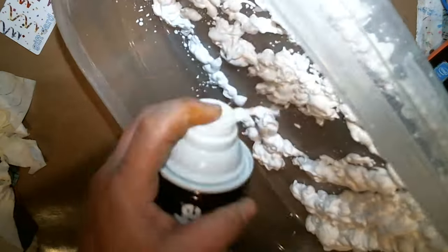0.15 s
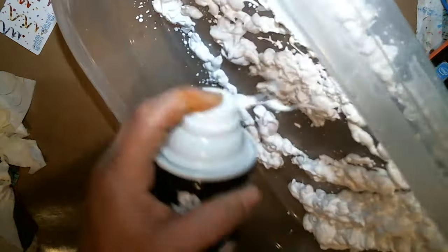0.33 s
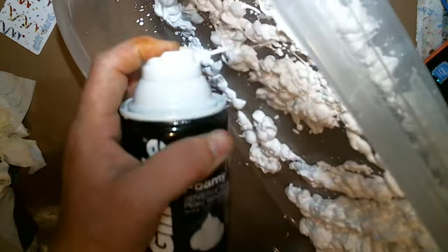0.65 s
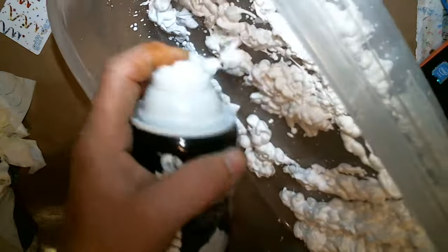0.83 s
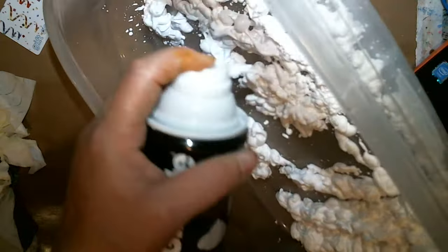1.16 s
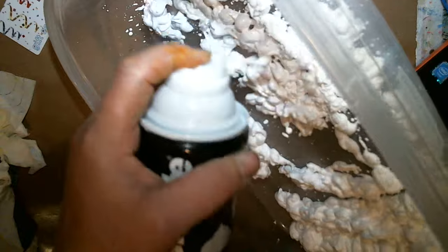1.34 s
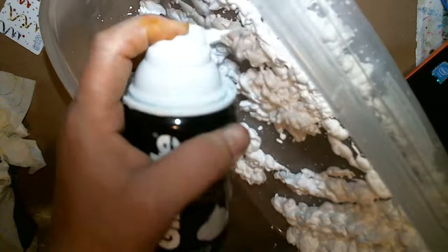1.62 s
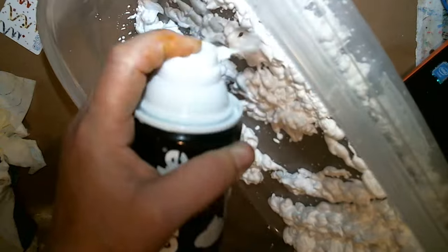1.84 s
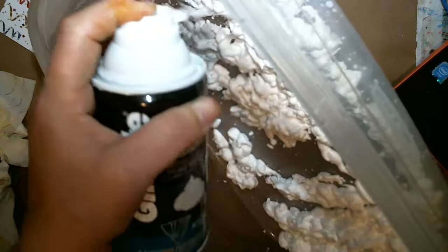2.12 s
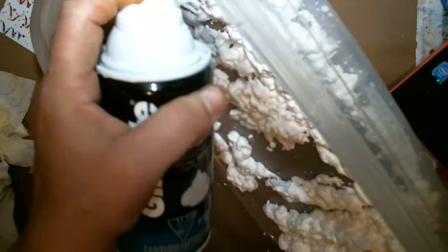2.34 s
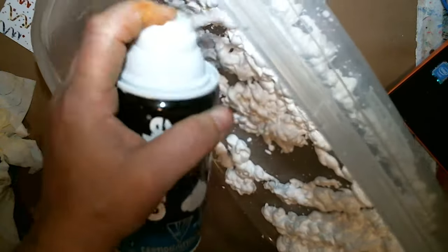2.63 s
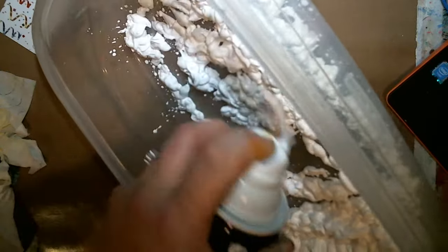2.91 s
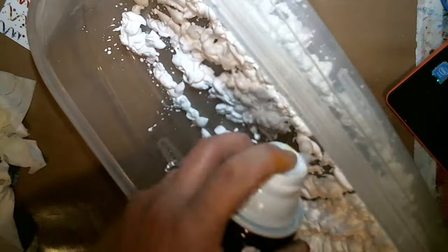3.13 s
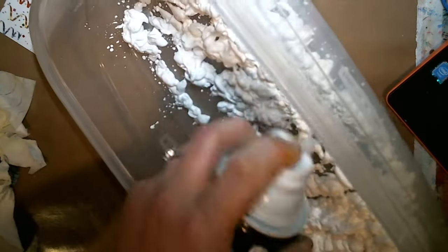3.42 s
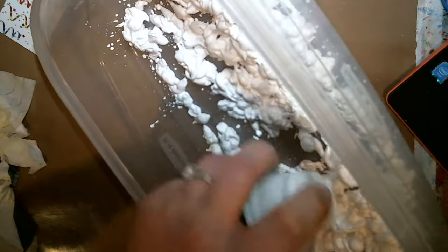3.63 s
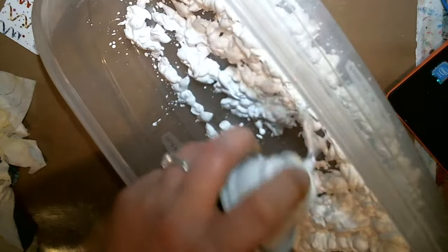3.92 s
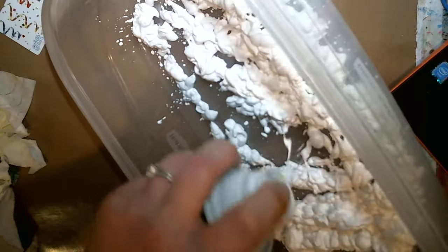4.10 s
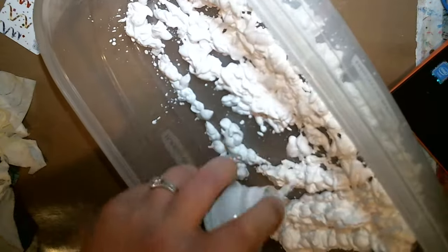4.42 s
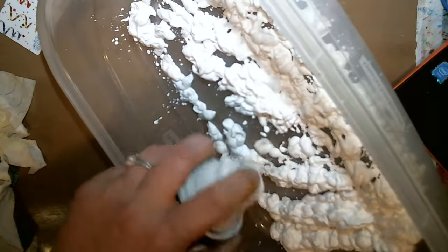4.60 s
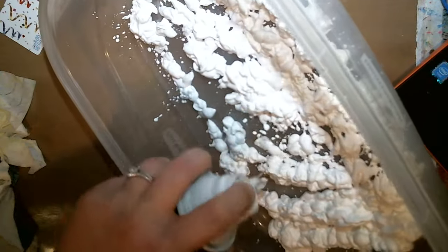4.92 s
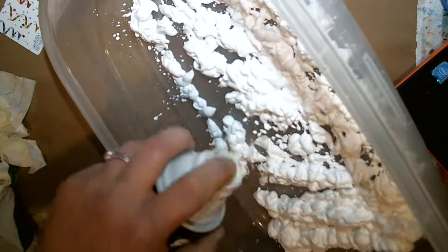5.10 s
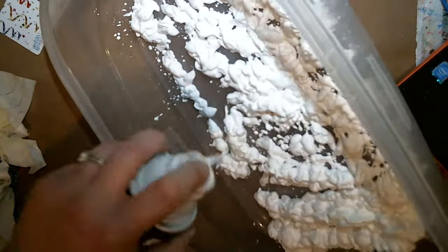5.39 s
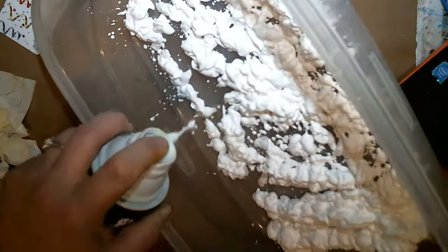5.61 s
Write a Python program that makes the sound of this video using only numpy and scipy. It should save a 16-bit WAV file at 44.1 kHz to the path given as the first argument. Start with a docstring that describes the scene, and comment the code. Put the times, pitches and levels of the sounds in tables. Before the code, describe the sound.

Very close to the microphone in a quiet room, a nearly empty aerosol can spits foam into a plastic tub. Dense irregular pops and crackling fizz begin at once over a hollow low gurgle, then turn drier and brighter with sharp bubble snaps. Spurts come unevenly, with brief gaps down to fine hiss, thicken with a wetter rasp after four seconds, thin out, and end on a fluttering whistly squirt.

```python
"""Sputtering foam can

A nearly empty aerosol can sputters foam into a plastic tub, close to the microphone, in a quiet room.
Gas breaks through in spurts: random pops ring the pocket they open; single big bubbles snap as swelling rings.
Small spurts, ticks, low gurgle and filtered-click fizz fill in; the last squirt whistles by pulsed nozzle resonance.
The tub adds a wall echo and a short noise tail; noise rumble, a harmonic buzz and soft sine bumps lie below."""
import sys
import numpy as np
from scipy import signal
from scipy.fft import rfft, irfft, next_fast_len
from scipy.io import wavfile
from scipy.ndimage import uniform_filter1d, map_coordinates

SR = 44100
rng = np.random.default_rng(int(sys.argv[2]) if len(sys.argv) > 2 else 0)


def store_wav(level_fs):
    """Save 16-bit WAV to argv[1]."""
    pcm = np.round(np.clip(np.atleast_2d(level_fs), -1, 1) * 32767)
    wavfile.write(sys.argv[1], SR, pcm.T.astype(np.int16))


N = 253560

# room rumble spectrum: f/Hz, relative density/dB
RUMBLE_SPECTRUM = [(15, -43), (25, -18), (91, -4.5), (188, 6), (366, 1.5), (413, -2), (450, -23),
                   (580, -34), (990, -120)]
# buzz harmonics: multiple of BUZZ_HZ, rms level/dB
BUZZ_HARMONICS = [(2, -87.5), (3, -84), (4, -85.5), (5, -89), (6, -85)]
# soft bumps of the hand on the can: t/s, peak level/dB, f/Hz
HAND_BUMPS = [(1.228, -59, 150), (1.96, -61, 224), (2.117, -59, 176), (2.472, -59, 121), (2.847, -62, 124),
              (3.083, -58, 176), (3.249, -59, 142), (3.701, -71, 70.6), (3.8, -63, 100), (3.878, -55, 176),
              (4.168, -64, 108), (4.478, -63, 92), (5.348, -66, 248), (5.451, -59, 171)]
# spray under the loud spurts: t/s, fizz level/dB, blend between two fizz colours/0-1
SPRAY_COURSE = [(0.0, -42, 0.13), (0.5, -42.5, 0.15), (0.75, -45.5, 0.12), (1.2, -46.5, 0.3),
                (1.36, -46, 0.44), (1.76, -45.5, 0.36), (2.58, -47, 0.46), (3.5, -47, 0.54),
                (3.91, -44, 0.36), (4.05, -45, 0.56), (4.5, -46.5, 0.1), (5.0, -45.5, 0.28),
                (5.75, -48.5, 0.14)]
# first fizz colour: f/Hz, shape (times 5.5 - blend gives dB)
FIRST_COLOUR = [(760, -0.5), (1300, -10), (1470, -2), (1630, 1), (1950, 0), (2230, -4), (2480, -1.5),
                (3110, -3), (3950, -2), (4920, -1.5), (6310, -4), (7690, -4.5), (10300, -4.5), (12500, -56),
                (15600, -53)]
# second fizz colour: f/Hz, shape (times blend gives dB, added to the first colour)
SECOND_COLOUR = [(760, -28.5), (1300, 36), (1630, -54), (2100, 1), (2280, 6), (2810, 6.5), (3450, 8.5),
                 (3750, 0), (4390, 7), (5020, -23), (5510, -0.5), (6250, -10), (9180, 0.5), (10400, -10),
                 (15600, -47)]
# tub modes: f/Hz, width of first resonator/Hz, relative level/dB
TUB_MODES = [(610, 144, 3.5), (834, 240, -6.5), (1069, 73, 1.5), (1326, 207, 1.5), (1943, 380, -2)]
# two lowest tub modes: deep gurgle, strongest in the first 1.2 s, uneven, faint later: t/s, level/dB
DEEP_GURGLE_COURSE = [(0, -44), (0.1, -58), (0.2, -49.5), (0.65, -50), (0.74, -66), (0.82, -49),
                      (1.2, -59.5), (1.4, -58), (5.0, -60.5), (5.25, -55), (5.54, -65), (5.75, -59)]
# small spurts: pocket f/Hz, relative level/dB before the random size
SMALL_SPURT_LEVELS = [(3000, -18), (4500, 1), (6500, -1), (9000, -5.5), (12000, -17), (15000, -25)]
# echo off the tub wall: t/s, extra path/ms, strength/0-1 (held to 0.95)
WALL_COURSE = [(0, 0.29, 0.85), (2.0, 0.23, 0), (2.6, 0.65, 0.1), (3.9, 0.27, 0.07), (4.7, 0.36, 0.56),
               (5.2, 0.35, 0.24), (5.5, 0.33, 0.8), (5.75, 0.31, 1)]
# bands that sound hollow as the can moves: width/Hz, course of (t/s, f/Hz, depth/0-1, held to 0.9)
HOLLOW_BANDS = [(151, [(2.4, 930, 0), (2.8, 875, 0.3), (4.2, 956, 0.7), (4.7, 1050, 1), (5.2, 1085, 0.9),
                (5.55, 1100, 0.8), (5.75, 1400, 1)]), (103, [(0, 1670, 1), (1.9, 1650, 0.45),
                (2.4, 1580, 0)]), (810, [(0.4, 2600, 0.2), (0.7, 2760, 0.74), (1.15, 2930, 0.53),
                (1.25, 2640, 0), (1.8, 2500, 0.34), (2.0, 2760, 0.66), (3.8, 2750, 0.67), (4.4, 2960, 0.55),
                (5.2, 2520, 0.47)])]
# whistle pulses of the last squirt: start t/s, length/s, lower whistle level/dB, upper whistle level/dB
SQUIRT_PULSES = [(5.558, 0.02, -46, -59), (5.59, 0.027, -54, -61), (5.612, 0.0072, -48, -37),
                 (5.626, 0.0078, -34.5, -37), (5.638, 0.0085, -32, -33), (5.656, 0.017, -36.5, -45),
                 (5.678, 0.022, -45, -37), (5.699, 0.0067, -31, -38), (5.709, 0.0073, -31.5, -31),
                 (5.727, 0.0044, -30, -56), (5.73, 0.0046, -28, -24), (5.738, 0.0069, -40, -30.5)]
# resonances of the foam-narrowed nozzle: f/Hz, width/Hz
NOZZLE_RESONANCES = [(2420, 290), (4990, 280)]
# single large bubbles that snap open: t/s, level/dB, f/Hz at the top of the swell
BUBBLE_SNAPS = [(0.2177, -30, 4070), (0.4483, -20.5, 4420), (0.478, -35, 4040), (0.5157, -30.5, 4200),
                (0.623, -20, 4790), (0.987, -32, 5750), (1.082, -23, 5300), (1.3614, -30, 3460),
                (1.4845, -26, 5020), (1.518, -27, 3140), (1.6367, -28, 4700), (1.748, -30, 4600),
                (1.843, -27, 4500), (2.0223, -28.5, 4860), (2.0417, -25, 4190), (2.208, -32, 6060),
                (2.241, -32, 6620), (2.468, -37, 5600), (2.4849, -23.5, 6000), (2.583, -27, 4720),
                (2.793, -37, 4800), (2.808, -16.5, 8260), (3.014, -31, 4260), (3.0705, -26.5, 4750),
                (3.0842, -29, 7800), (3.259, -23.5, 8000), (3.572, -28, 5200), (3.6506, -27, 9200),
                (4.008, -22, 7150), (4.1833, -25.5, 3400), (4.3153, -39, 4550), (4.5244, -24, 4150),
                (4.536, -32, 5250), (4.701, -27.5, 5070), (5.0507, -41, 6000)]
# loud spurts: start t/s, length/s, level before fade and stutter/dB, pocket f/Hz
LOUD_SPURTS = [(0.003, 0.029, -46, 600), (0.035, 0.05, -38.5, 5830), (0.039, 0.055, -33.5, 630),
               (0.073, 0.031, -32, 3160), (0.14, 0.094, -34, 587), (0.21, 0.087, -52, 4660),
               (0.217, 0.049, -37, 610), (0.266, 0.034, -41.5, 1026), (0.273, 0.021, -34.5, 4070),
               (0.338, 0.041, -40, 8800), (0.402, 0.076, -37.5, 634), (0.428, 0.032, -31, 4850),
               (0.521, 0.12, -40.5, 890), (0.335, 0.044, -40.5, 587), (0.572, 0.1, -36, 627),
               (0.572, 0.046, -27.5, 5900), (0.617, 0.033, -39, 5060), (0.626, 0.032, -38.5, 10600),
               (0.676, 0.027, -35, 6500), (0.737, 0.05, -51, 1980), (0.742, 0.045, -36.5, 5140),
               (0.793, 0.057, -40, 913), (0.795, 0.053, -43.5, 560), (0.85, 0.03, -42, 1960),
               (0.885, 0.017, -55, 570), (0.888, 0.02, -34.5, 1310), (0.898, 0.024, -41, 2460),
               (0.937, 0.026, -28.5, 5200), (0.93, 0.046, -39.5, 1034), (0.945, 0.062, -42, 564),
               (0.969, 0.041, -30.5, 5920), (1.037, 0.0098, -37, 1040), (1.075, 0.028, -32, 5200),
               (1.098, 0.023, -31.5, 6100), (1.11, 0.033, -35.5, 9440), (1.118, 0.011, -35.5, 575),
               (1.15, 0.036, -39, 7000), (1.19, 0.03, -39, 2510), (1.21, 0.034, -42, 830),
               (1.24, 0.059, -46, 564), (1.214, 0.0069, -35, 4130), (1.222, 0.0063, -29.5, 5570),
               (1.258, 0.021, -36.5, 2420), (1.303, 0.048, -35, 2560), (1.295, 0.18, -40.5, 3340),
               (1.355, 0.022, -36, 3280), (1.41, 0.015, -36, 3350), (1.42, 0.034, -41.5, 2400),
               (1.47, 0.0079, -48, 5940), (1.515, 0.034, -36, 3200), (1.399, 0.042, -39, 3200),
               (1.45, 0.026, -47, 1040), (1.472, 0.039, -35.5, 5200), (1.488, 0.032, -35, 3140),
               (1.582, 0.039, -37, 4730), (1.67, 0.035, -39.5, 1020), (1.677, 0.014, -32, 5820),
               (1.681, 0.021, -32, 11000), (1.744, 0.068, -38, 4600), (1.768, 0.037, -36, 7550),
               (1.783, 0.03, -31.5, 4720), (1.838, 0.041, -40, 4750), (1.867, 0.015, -32, 6040),
               (2.036, 0.12, -41, 4350), (2.037, 0.059, -34, 6240), (2.076, 0.071, -42, 580),
               (2.091, 0.012, -34, 1325), (2.131, 0.034, -38, 10100), (2.203, 0.051, -37.5, 5970),
               (2.276, 0.026, -39, 5900), (2.343, 0.012, -26, 6030), (2.367, 0.024, -43, 9000),
               (2.402, 0.028, -56, 14100), (1.985, 0.021, -58, 13500), (2.14, 0.049, -52, 13500),
               (2.449, 0.082, -31, 5500), (2.481, 0.02, -27, 6500), (2.508, 0.0058, -31, 5000),
               (2.577, 0.028, -38, 6400), (2.661, 0.012, -23.5, 5800), (2.704, 0.047, -31.5, 4570),
               (2.755, 0.027, -42, 2700), (2.788, 0.014, -35.5, 4350), (2.789, 0.042, -32.5, 9500),
               (2.806, 0.0058, -26, 8100), (2.809, 0.041, -33, 3380), (2.835, 0.035, -46, 11000),
               (2.892, 0.011, -30, 3360), (2.895, 0.068, -34.5, 7500), (3.056, 0.029, -34.5, 4430),
               (3.078, 0.087, -40.5, 8230), (3.253, 0.049, -34.5, 8020), (3.27, 0.013, -26.5, 4910),
               (3.334, 0.018, -38, 1070), (3.349, 0.023, -38.5, 11100), (3.44, 0.0092, -23.5, 4480),
               (3.463, 0.014, -30.5, 4400), (3.47, 0.066, -42, 9000), (3.508, 0.037, -38, 4800),
               (3.568, 0.024, -34, 4470), (3.644, 0.021, -33.5, 8350), (3.792, 0.011, -24.5, 5320),
               (3.814, 0.033, -36, 5330), (3.914, 0.043, -38.5, 8530), (3.916, 0.027, -34.5, 3680),
               (3.976, 0.016, -26, 3840), (3.982, 0.0096, -28.5, 7600), (4.005, 0.042, -44.5, 8100),
               (4.013, 0.0097, -32, 2460), (4.029, 0.028, -28, 2510), (4.05, 0.033, -42, 8560),
               (4.149, 0.025, -32, 2440), (4.155, 0.013, -36, 10200), (4.178, 0.011, -25, 2516),
               (4.179, 0.032, -33.5, 3600), (4.201, 0.048, -35, 2580), (4.37, 0.027, -42.5, 2500),
               (4.225, 0.065, -40, 10300), (4.25, 0.072, -36, 1840), (4.462, 0.046, -37, 2190),
               (4.678, 0.039, -43, 2500), (4.7, 0.038, -61, 1680), (5.075, 0.1, -54, 1760),
               (4.412, 0.1, -39, 1800), (4.476, 0.019, -35.5, 9240), (4.519, 0.029, -23, 4580),
               (4.548, 0.018, -27, 5030), (4.56, 0.11, -32, 1880), (4.588, 0.06, -32.5, 1927),
               (4.632, 0.017, -33, 4900), (4.652, 0.011, -41, 9600), (4.692, 0.04, -43, 4700),
               (4.71, 0.029, -36, 10400), (4.735, 0.059, -39.5, 1850), (4.744, 0.016, -28, 8500),
               (4.832, 0.01, -22, 5800), (4.83, 0.017, -35, 2500), (4.899, 0.053, -31, 1874),
               (4.906, 0.023, -30.5, 4100), (4.959, 0.021, -39, 1930), (4.967, 0.012, -33, 4970),
               (4.975, 0.045, -38, 2460), (5.048, 0.027, -40, 1860), (5.049, 0.014, -31.5, 5900),
               (5.102, 0.0068, -33.5, 5630), (5.175, 0.018, -35.5, 5700), (5.322, 0.017, -37, 5600),
               (5.342, 0.014, -40.5, 9250), (4.37, 0.012, -38, 4650), (4.875, 0.022, -41, 5100),
               (2.745, 0.13, -55, 12100), (3.005, 0.031, -41.5, 10500), (5.4, 0.019, -36, 8840),
               (5.459, 0.043, -37, 4900), (5.613, 0.012, -33.5, 8400), (5.643, 0.0099, -35, 9000),
               (5.692, 0.014, -36.5, 8700), (5.743, 0.0043, -39, 8200)]
# pocket width at the usual spurt level: pocket f/Hz, width as share of f
POCKET_WIDTH_SHARE = [(600, 0.18), (1100, 0.081), (1850, 0.12), (2500, 0.17), (3200, 0.16), (5000, 0.43),
                      (9000, 0.44)]

CUTOFF_HZ = 15750
BUZZ_HZ, RUMBLE_DB = 30.3, -72.5
SMALL_DB, TICKS_REL_DB, UPPER_GURGLE_DB = -52, -13.5, -53
NARROWS_DB_PER_DB, USUAL_SPURT_DB = 1, -29
SNAP_SWELL_CYCLES, SNAP_CLIMB_PER_CYCLE, SNAP_GRIT_SHARE = 5.36, 0.0064, 0.28
NOZZLE_WAVER_SHARE = 0.016  # the foam lip shifts both whistles together
PULSE_EDGE_S, SEEP_DB, SEEP_DECAY_S = 0.003, -30, 0.0078  # seep: what leaks on after a pulse


def amp(db):
    """dB to amplitude."""
    return 10 ** (np.asarray(db) / 20)


def rms_one(x):
    """Scale to rms 1."""
    return x / np.sqrt(np.mean(x ** 2) + 1e-20)


def in_time(rows):
    """Interpolate each column of a time course to every sample."""
    s, *columns = np.transpose(rows)
    return [np.interp(np.arange(N) / SR, s, c) for c in columns]


def at_hz(points, hz):
    """Read a curve along log frequency."""
    hz_points, values = np.transpose(points)
    return np.interp(np.log(hz), np.log(hz_points), values)


def drift(rate_hz):
    """Slow chance, spread 1: noise through a double pole, run at SR / 40."""
    r = np.exp(-80 * np.pi * rate_hz / SR)
    noise = rng.standard_normal(N // 40 + 2002)
    slow = signal.lfilter([1], [1, -2 * r, r * r], noise)[2000:]
    return np.interp(np.arange(N) / 40, np.arange(len(slow)), rms_one(slow))


def resonate(x, hz, width_hz):
    """One resonance, gain 1 on top."""
    r = np.exp(-np.pi * width_hz / SR)
    poles = [1, -2 * r * np.cos(2 * np.pi * hz / SR), r * r]
    return signal.lfilter(np.array([1, 0, -1]) * (1 - r * r) / 2, poles, x)


def pops(per_s, spread_db, size):
    """Film bursts: clicks at random moments, mostly small, a few large."""
    draw = rng.random((3, size))
    sizes = amp(spread_db * np.minimum(-np.log(draw[0] + 1e-9), 4))
    signs = np.sign(draw[1] - .5)
    return rms_one(sizes * signs * (draw[2] < per_s / SR) + 1e-9)


def bands(x, spectrum, count, patchy_db):
    """Narrow bands with their centres; each band flickers on its own."""
    edges = np.geomspace(spectrum[0][0], spectrum[-1][0], count)
    for k, (low, high) in enumerate(zip(edges, edges[1:])):
        sos = signal.butter(2, [low, high], "band", fs=SR, output="sos")
        band = signal.sosfilt(sos, x[k % 2])
        yield np.sqrt(low * high), band * amp(patchy_db * drift(20.5))


def add_spurt(out, film, start_s, length_s, level_db, hz, width_hz, rise=0.015, edge_s=0.00083,
              swell=0.21, fade_db=-7.0, cycles=8.5, widest_hz=520):
    """Each pop rings a bubble of its own size; pitch climbs and level fades as the pocket empties."""
    i = max(round((start_s - edge_s / 2) * SR), 0)
    n = round((length_s + 5 * edge_s) * SR)
    t = np.arange(min(n, N - i)) / SR
    late = t / t[-1]
    gate = np.clip(t / (edge_s + swell * length_s), 0, 1) * amp(fade_db * t / length_s)
    gate = gate * np.exp(-np.maximum(t - length_s, 0) / edge_s)
    blow = film[0, i:i + len(t)] * gate
    bubble_of_pop = (film[1, i:i + len(t)] * 4).astype(int)
    rung = 0
    for k, offset in enumerate((-0.18, 0.0028, 0.14, 0.35)):
        bubble_hz = min(hz + offset * width_hz, .45 * SR)
        sharp_hz = min(bubble_hz / cycles, width_hz * 0.46, widest_hz * max(1, hz / 8500) ** 2)
        share = 1 + rise * 10 * offset * (2 * late - 1)  # small, high bubbles gain late
        ring = resonate(blow * (bubble_of_pop == k) * share + 1e-12, bubble_hz, sharp_hz)
        ring = resonate(ring, bubble_hz, 2.0 * sharp_hz)
        rung = rung + ring * (1 - 2.0 * abs(offset))
    out[i:i + len(t)] += amp(level_db) * rms_one(rung) * np.sqrt(np.mean(gate ** 2))


def wall_echo(x):
    """A short, dull echo cuts notches that move with the can."""
    path_ms, strength = in_time(WALL_COURSE)
    dull = signal.filtfilt(*signal.butter(2, 3800, fs=SR), x)
    late = map_coordinates(dull, [np.arange(N) - path_ms * SR / 1000], order=3)
    return x + np.clip(strength, 0, .95) * late


def dip(x, width_hz, rows):
    """A moving band is shifted to zero, isolated, shifted back and taken out."""
    hz, depth = in_time(rows)
    turn = np.exp(2j * np.pi * np.cumsum(hz) / SR)
    band = signal.filtfilt(*signal.butter(2, width_hz / 2, fs=SR), x / turn)
    return x - 2 * np.clip(depth, 0, .9) * (band * turn).real


def tub_tail(x, t60_s=0.032, level_db=-7.0, even_hz=350):
    """Bounces in the tub give a short dying tail and a fine ripple; the broad colour is kept."""
    t, size = np.arange(1, 2600) / SR, next_fast_len(N + SR // 4)
    tail = rng.standard_normal(len(t)) * amp(-60 * t / t60_s)
    tub = rfft(np.r_[1, amp(level_db) * tail / np.linalg.norm(tail)], size)
    broad = uniform_filter1d(np.abs(tub) ** 2, int(even_hz * size / SR))
    return irfft(rfft(x, size) * tub / np.sqrt(broad), size)[:N]


def rumble():
    """Room rumble: noise in flickering bands."""
    noise_bands = bands(rng.standard_normal((2, N)), RUMBLE_SPECTRUM, count=12, patchy_db=4.0)
    return amp(RUMBLE_DB) * rms_one(sum(band * amp(at_hz(RUMBLE_SPECTRUM, hz)) for hz, band in noise_bands))


def buzz():
    """A steady buzz: cosine harmonics."""
    t = np.arange(N) / SR
    return sum(np.sqrt(2) * amp(db) * np.cos(2 * np.pi * k * BUZZ_HZ * t) for k, db in BUZZ_HARMONICS)


def bumps():
    """Hand on can: sines that swell and die within a few cycles."""
    out, t = np.zeros(N), np.arange(SR // 8) / SR
    for s, db, hz in HAND_BUMPS:
        since, i = t * hz / 1.5, round(s * SR)
        bump = since * np.exp(-2.5 * since) * np.sin(3 * np.pi * since)
        out[i:i + len(bump)] += amp(db) * bump / np.abs(bump).max()
    return out


def fizz(blend):
    """Dense tiny bursts, coming in clumps; their colour drifts between two spectra."""
    clumps = amp(2.0 * drift(62))
    film = [pops(3700, 5.1, N), pops(4000, 12.4, N)]
    total = 0
    for hz, band in bands(film, FIRST_COLOUR, count=26, patchy_db=3.5):
        colour_db = (5.5 - blend) * at_hz(FIRST_COLOUR, hz) + blend * at_hz(SECOND_COLOUR, hz)
        total = total + band * amp(colour_db)
    return rms_one(clumps * total)


def ticks():
    """Lone droplets burst with a dry, wide tick, duller at the very top."""
    film = pops(2200 * amp(4.7 * drift(30)), 12.0, N)
    wide = resonate(film, 5200, 4900) + amp(-2.0) * resonate(film, 10300, 5000)
    return rms_one(signal.sosfilt(signal.butter(4, 11500, fs=SR, output="sos"), wide))


def gurgle():
    """Larger bubbles break against the tub floor and ring its low modes."""
    blows = [pops(900 * amp(3.0 * drift(14)), 1.26, N) for _ in range(2)]
    modes = []
    for k, (hz, width_hz, db) in enumerate(TUB_MODES):
        ring = resonate(resonate(blows[k % 2], hz, width_hz), hz, 1.94 * width_hz)
        modes.append(amp(db + 1.48 * drift(15.0)) * ring / np.sqrt(width_hz))
    deep = amp(in_time(DEEP_GURGLE_COURSE)[0]) * rms_one(modes[0] + modes[1])
    return deep + amp(UPPER_GURGLE_DB) * rms_one(sum(modes[2:]))


def small_spurts(count=1000):
    """Many short spurts at random moments, pitches and strengths."""
    out, film = np.zeros(N), np.array([pops(2000, 4.9, 2 * N), rng.random(2 * N)])
    for k, (when, long, pitch, size) in enumerate(rng.random((count, 4))):
        hz = 3300 * 4.4 ** pitch
        start_s, length_s = when * (N / SR - .01), 0.0016 + 0.02 * long ** 2
        level_db = at_hz(SMALL_SPURT_LEVELS, hz) + 21.7 * size
        add_spurt(out, film[:, k * 151:], start_s, length_s, level_db, hz, 0.4 * hz)
    return rms_one(out)


def squirt():
    """Pulses of pops ring each nozzle resonance, which wavers in pitch."""
    first, out = round(SQUIRT_PULSES[0][0] * SR) - 200, np.zeros(N)
    t, lip = np.arange(first, N) / SR, drift(42)[first:]
    for k, (hz, width_hz) in enumerate(NOZZLE_RESONANCES):
        power = 0
        for s, length_s, *level_db in SQUIRT_PULSES:
            after = np.maximum(t - s - length_s, 0)
            fall = np.exp(-after / PULSE_EDGE_S) + amp(SEEP_DB) * np.exp(-after / SEEP_DECAY_S)
            gate = np.clip((t - s) / PULSE_EDGE_S, 0, 1) * fall
            power = power + (amp(level_db[k]) * gate) ** 2
        # ring around zero frequency, level evened out, then shifted up to the wavering pitch
        r = np.exp(-np.pi * width_hz / SR)
        blow = pops(1800, 6.4, len(t)) * np.exp(2j * np.pi * rng.random(len(t)))
        ring = signal.lfilter([1], [1, -2 * r, r * r], blow)
        ring = ring / np.sqrt(uniform_filter1d(np.abs(ring) ** 2, size=250))
        turn = np.exp(2j * np.pi * np.cumsum(hz * (1 + NOZZLE_WAVER_SHARE * lip)) / SR)
        out[first:] += np.sqrt(2 * power) * (ring * turn).real
    return out


def snaps():
    """Each snap is a short gritty ring that swells, climbs a little and dies."""
    out, t = np.zeros(N + 900), np.arange(900) / SR
    for (s, db, hz), noise in zip(BUBBLE_SNAPS, rng.standard_normal((len(BUBBLE_SNAPS), 900))):
        cycles = hz * t
        swell = (cycles / SNAP_SWELL_CYCLES * np.exp(1 - cycles / SNAP_SWELL_CYCLES)) ** 2
        climb = 1 + SNAP_CLIMB_PER_CYCLE * (cycles / 2 - SNAP_SWELL_CYCLES)
        grit = SNAP_GRIT_SHARE * rms_one(resonate(noise, hz, 0.17 * hz))
        ring = np.sin(2 * np.pi * cycles * climb) + grit
        i = round(s * SR)
        out[i:i + 900] += amp(db) * swell * ring / (1 + SNAP_GRIT_SHARE)
    return out[:N]


def loud_spurts():
    """Gas breaks through bursting film; a stronger spurt rings a narrower pocket."""
    out, film = np.zeros(N), np.array([pops(1600, 5.47, 2 * N), rng.random(2 * N)])
    for k, (start_s, length_s, db, hz) in enumerate(LOUD_SPURTS):
        widen_db = min(-NARROWS_DB_PER_DB * (db - USUAL_SPURT_DB), 3.0)
        width_hz = hz * at_hz(POCKET_WIDTH_SHARE, hz) * amp(widen_db)
        own_film = film[:, k * 997:]
        add_spurt(out, own_film, start_s, length_s, db, hz, width_hz, rise=0.026, swell=0.26, fade_db=-14.0)
    return out


def scene():
    """Spray coloured by wall and tub, over the room, buzz and bumps."""
    fizz_db, blend = in_time(SPRAY_COURSE)
    bed = gurgle() + amp(fizz_db) * fizz(np.clip(blend, 0, 1))
    bed = wall_echo(bed + amp(SMALL_DB) * (small_spurts() + amp(TICKS_REL_DB) * ticks()))
    for width_hz, rows in HOLLOW_BANDS:
        bed = dip(bed, width_hz, rows)
    stutter = amp(0.79 * drift(24) + 1.91 * drift(120))  # shared by bed and loud spurts
    spray = stutter * (bed + loud_spurts()) + snaps() + squirt()
    # the small nozzle sends out no bass
    spray = signal.sosfilt(signal.butter(6, 440, "high", fs=SR, output="sos"), spray)
    return (tub_tail(spray) + rumble() + buzz() + bumps())[None]


def record(dry):
    """A steep low-pass cuts the top."""
    return signal.sosfilt(signal.ellip(12, .5, 80, CUTOFF_HZ, fs=SR, output="sos"), dry)


dry = scene()
out = record(dry)
store_wav(out)
```